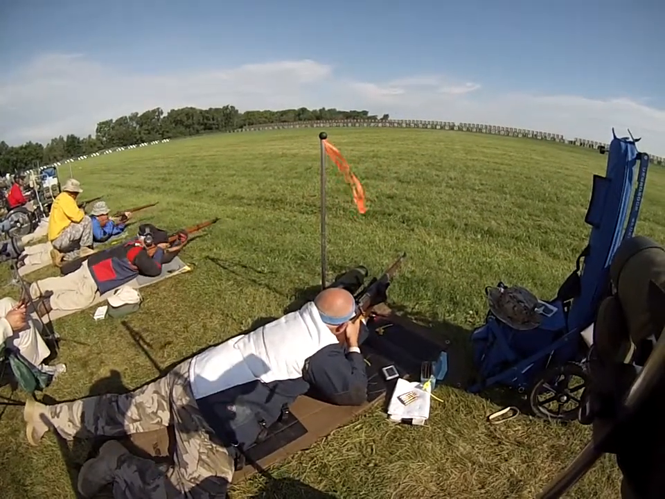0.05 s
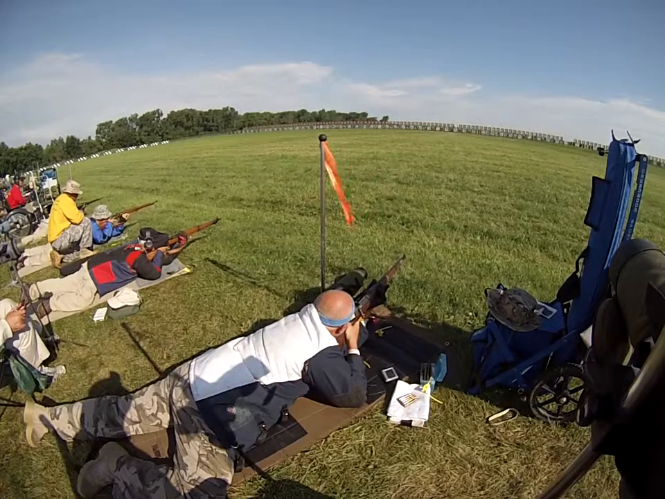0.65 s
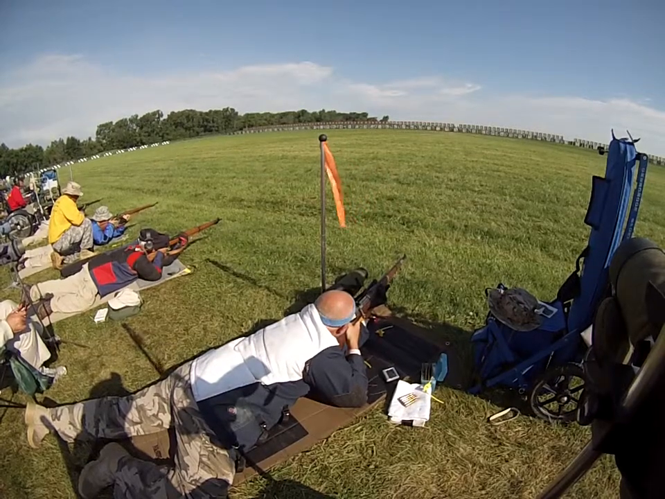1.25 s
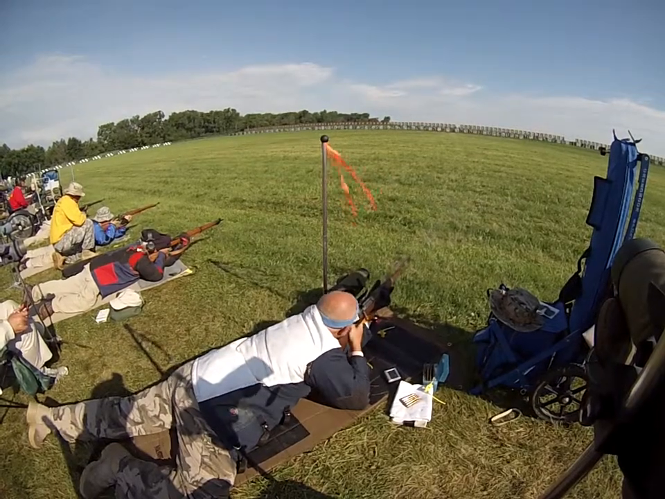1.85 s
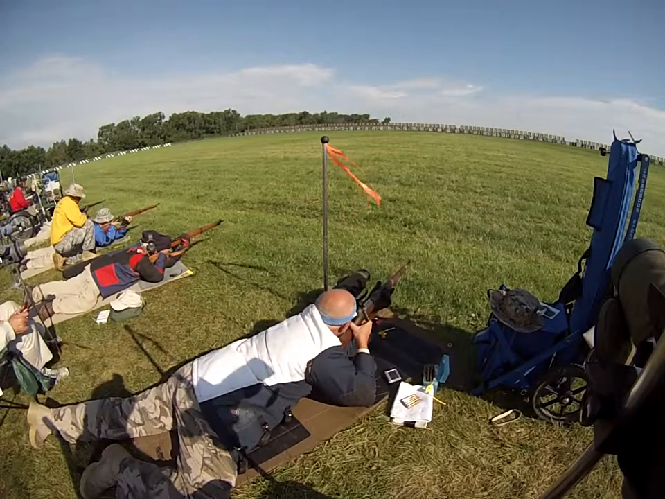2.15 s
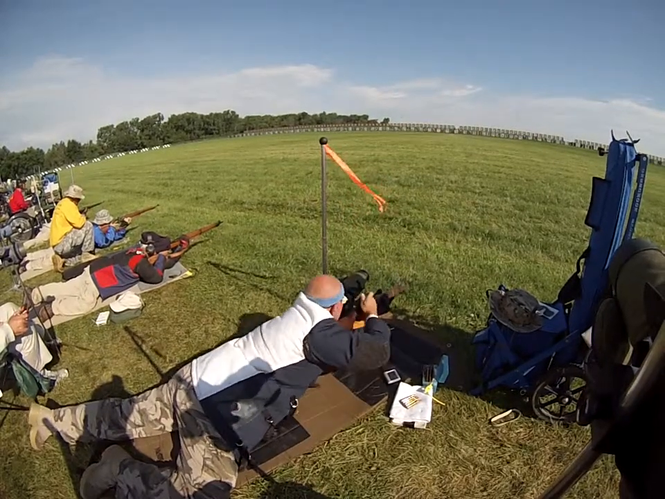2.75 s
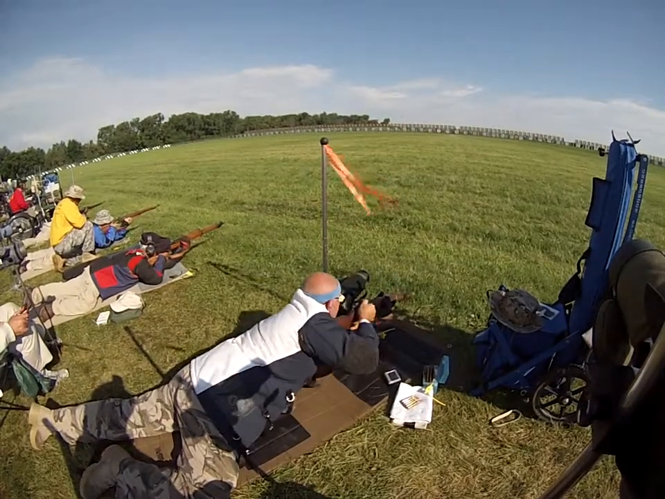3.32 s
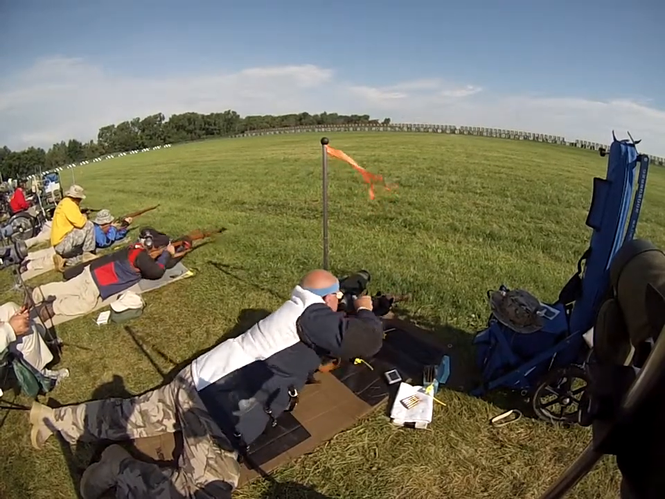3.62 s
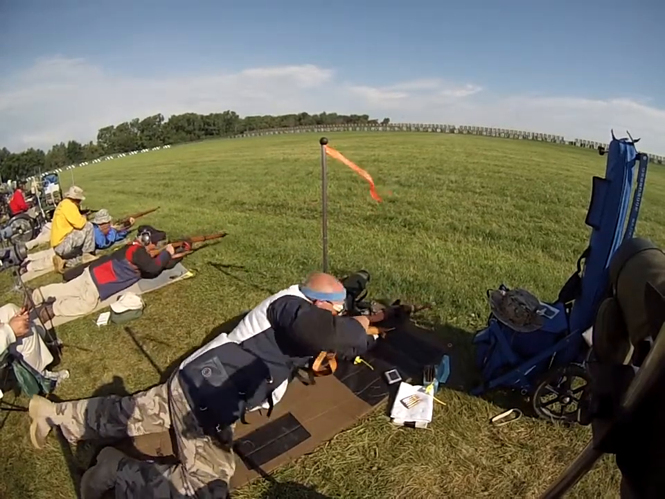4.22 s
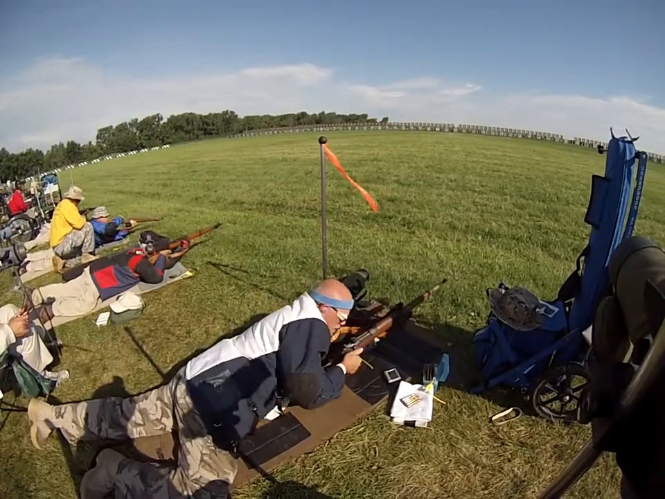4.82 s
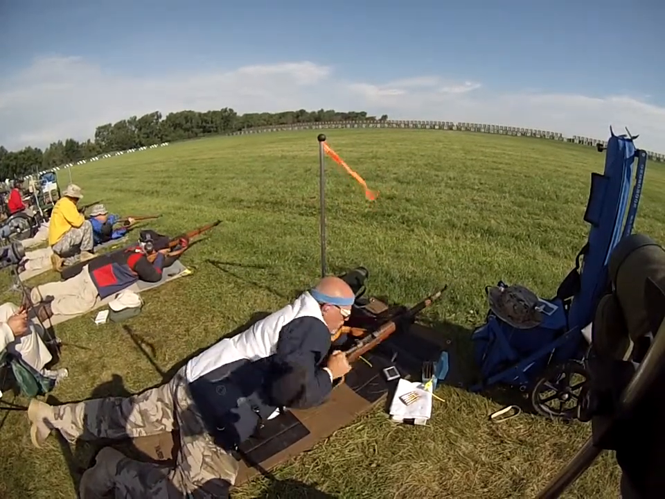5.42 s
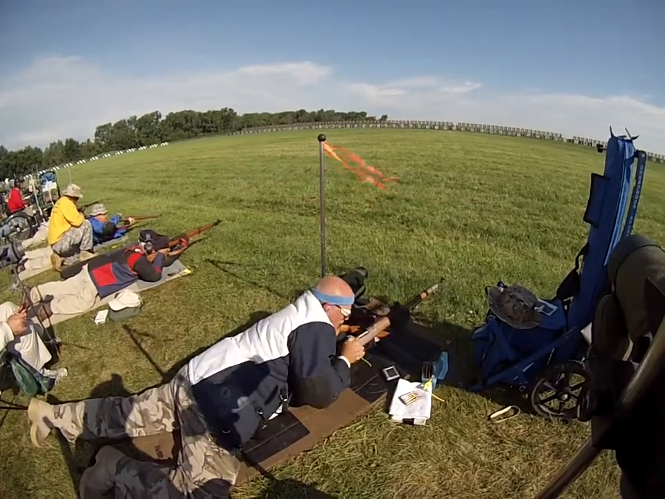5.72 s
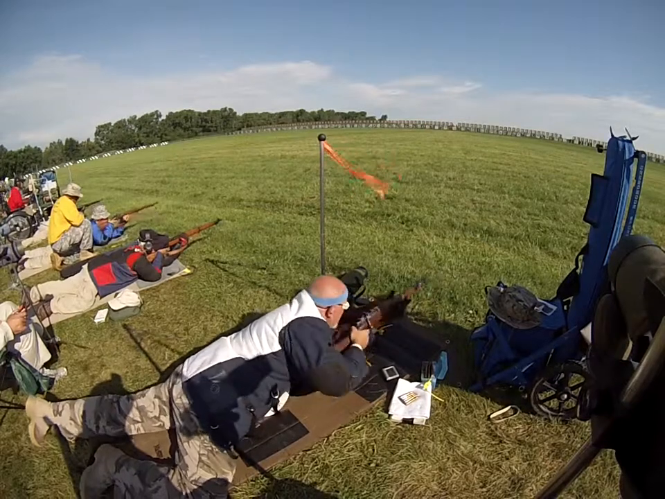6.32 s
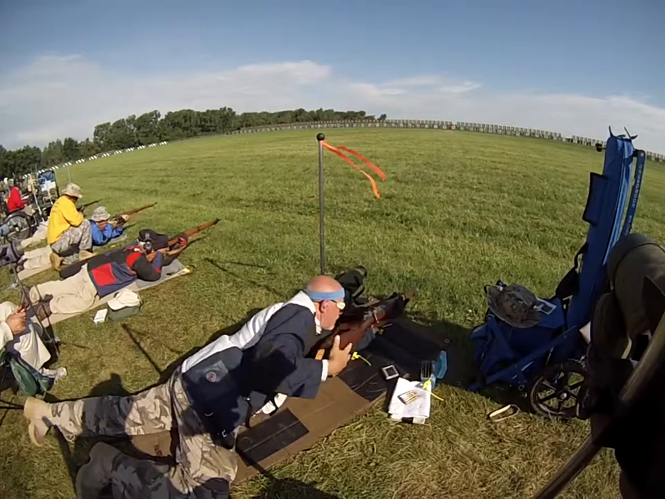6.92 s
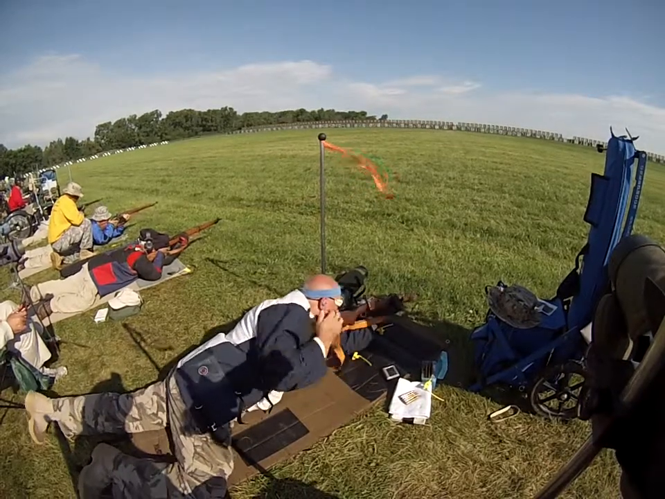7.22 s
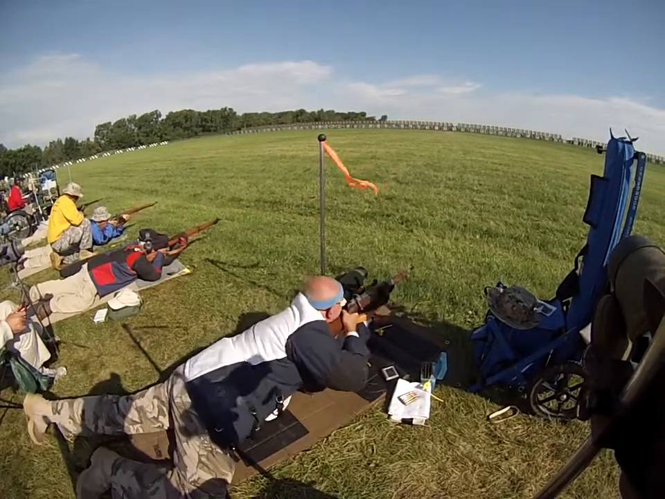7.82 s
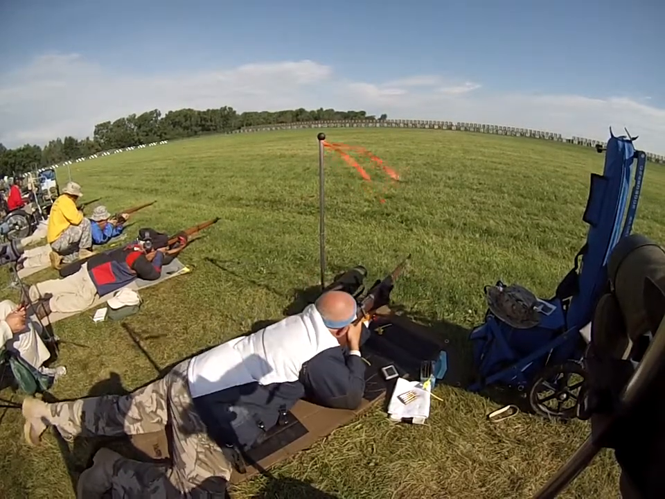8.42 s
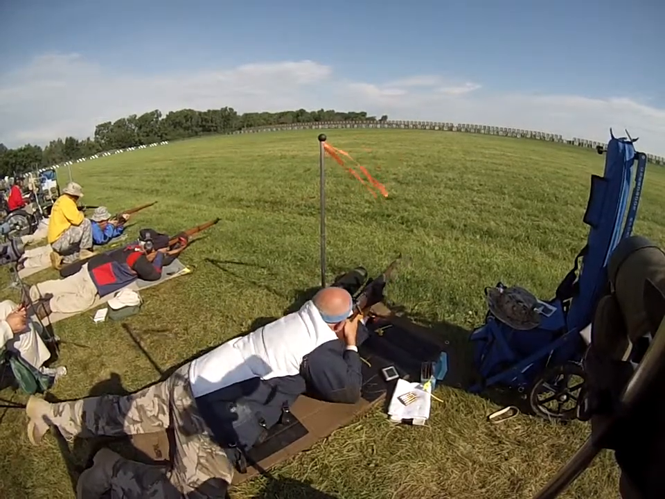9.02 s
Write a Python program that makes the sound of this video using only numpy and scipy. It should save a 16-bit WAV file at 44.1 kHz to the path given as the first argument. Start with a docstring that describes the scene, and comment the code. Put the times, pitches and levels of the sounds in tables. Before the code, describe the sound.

Many rifles fire along an outdoor range, with sharp near cracks, dull distant pops, rolling echo and a bolt being worked.

```python
"""An open grass rifle range in rapid fire, heard from a small cased camera just behind the firing line.
Each muzzle blast is a sharp crack plus a low ground wave; the crack rings the case, and near shots
overload the recorder. The grass sizzles, steel gear rings along and far rifles pop and thud.
Echoes from the tree line merge into a rolling wash, and the nearest shooter works his bolt."""
import sys
import numpy as np
from scipy import signal
from scipy.fft import rfft, irfft, next_fast_len
from scipy.io import wavfile
from scipy.ndimage import minimum_filter1d, map_coordinates

SR = 44100
rng = np.random.default_rng(int(sys.argv[2]) if len(sys.argv) > 2 else 0)


def generate_wav(signal):
    """Clip the signal to [-1, 1] and save it as 16-bit WAV at the path in sys.argv[1]."""
    frames = np.transpose(np.atleast_2d(signal))
    scaled = np.clip(frames, -1, 1) * 32767
    pcm = np.round(scaled).astype(np.int16)
    wavfile.write(sys.argv[1], SR, pcm)


N = 403956

# shots that stand out along the line: t/s, crack gain/dB, boom gain/dB, treble tilt/(dB per octave)
SHOT_CUES = [(0.049, -27.5, -20, 3.5), (0.2031, 11.5, -3.5, -3), (0.312, -13, -33, -5.5),
             (0.3712, -9.5, -16.5, -0.5), (0.4173, -13.5, -21, 3.5), (0.578, -13.5, -26, 2),
             (0.6832, -19, -21.5, -6), (0.7631, 0, -12, -0.5), (0.834, 10, -4.5, -1), (0.9843, -11, -19, 4),
             (1.0086, -11, -26, -4), (1.152, -1.5, -16, 0), (1.2005, -10, -24, -0.5), (1.403, -7, -18, -15),
             (1.4141, -26, -22, 2), (1.5222, -15, -20, -6), (1.584, -14, -27, 0.5),
             (1.6053, -8.5, -18, -0.5), (1.6388, 23, -4, -2), (1.6486, 9.5, -8, 4),
             (1.8369, -10.5, -16.5, -4.5), (1.8891, -9.5, -18.5, 4.5), (1.9458, 10.5, -2, -2.5),
             (1.9543, -10, -30, -4), (2.1449, 10, -7.5, -7.5), (2.242, -11.5, -23.5, 1.5),
             (2.254, -19, -23, -1), (2.4605, -12.5, -28, 0.5), (2.5355, -11.5, -25, 0), (2.578, 16.5, 3, 2),
             (2.7789, -8, -20, 3), (2.8544, -14, -35, 0.5), (2.9616, -13.5, -35, 0), (3.0274, -2.5, -15, 1),
             (3.051, 13, 0.5, 3), (3.1812, 17, 2.5, 4), (3.2705, -12, -26, 2), (3.5141, 10, -4, 1.5),
             (3.6319, 14.5, -2.5, -2.5), (3.706, -12, -36, -3.5), (3.8549, 1.5, -10.5, -5.5),
             (3.8843, -2, -21, -7), (3.891, 4.5, -7, -4), (3.9798, 21, 2.5, -1), (4.0763, -14, -26, 4.5),
             (4.1085, -10.5, -28, 1.5), (4.1706, 5, -8, 0.5), (4.2478, 9, -4.5, -1),
             (4.3052, -1.5, -17, -1.5), (4.3157, -9.5, -24, 3.5), (4.3615, 13, -1, 2.5),
             (4.3937, -10.5, -22, 2.5), (4.4856, -12, -33, 2.5), (4.7756, 8.5, -6, -6.5),
             (5.0116, 11, -3.5, -2), (5.2428, -13.5, -34, -5), (5.2744, -1.5, -16, 2),
             (5.2887, 8.5, -1, 4.5), (5.3871, 17, 1.5, -2.5), (5.7388, -12.5, -29, 1),
             (5.776, -1.5, -14.5, 2), (5.8569, 5.5, -7, -3), (5.8906, -8.5, -20.5, 3.5),
             (6.0318, -19, -22.5, -1.5), (6.0704, -10.5, -22, 2), (6.1788, -10.5, -26, -1.5),
             (6.267, -14, -19.5, -3), (6.4236, -11.5, -28, 2), (6.4596, -9, -15.5, -6.5),
             (6.551, 3.5, -8, -7), (6.7696, -15.5, -30, -1.5), (6.7953, -24.5, -21.5, -4),
             (7.1138, 9.5, -4.5, -1), (7.1565, -11, -30, -1), (7.193, -11.5, -23, 5.5), (7.3, -3, -16, 4.5),
             (7.5879, -9, -31, -4.5), (7.6695, -12, -37, -4), (7.7819, 9.5, -2, -1),
             (7.9243, -9.5, -26, -2), (8.233, -28, -23, -8), (8.3357, -9, -21, 3.5),
             (8.397, -10.5, -25, 0.5), (8.4979, 3, -10.5, -1.5), (8.5283, 24.5, -6, -3),
             (8.5564, 8.5, -8, 1), (8.7405, -13.5, -20.5, -2.5), (8.838, 9, -3.5, 2), (8.9771, -9, -18, 4),
             (9.0599, -11, -26, -2.5)]


def amp(db):
    return 10 ** (np.asarray(db) / 20)


def unit_rms(x):
    return x / np.sqrt(np.mean(x ** 2) + 1e-20)


def unit_peak(response):
    """Scale a response so that its pulse peaks at 1."""
    return response / np.abs(irfft(response)).max()


def resonance(f, hz, width):
    return 1j * f * width / (hz * hz - f * f + 1j * f * width)


def wobble(rate):
    """A smooth random curve, rate knots a second."""
    knots = rng.standard_normal(int(N * rate / SR) + 4)
    return map_coordinates(knots, [np.arange(N) * rate / SR])


def filtered(x, response):
    """Pass x through a complex response of frequency."""
    n = x.shape[-1]
    padded = next_fast_len(n + SR // 10)
    return irfft(rfft(x, padded) * response(np.fft.rfftfreq(padded, 1 / SR)), padded)[..., :n]


def coloured(noise, eq):
    """Shape noise with an EQ curve (f/Hz, level/dB) and bring it to unit RMS."""
    hz, db = np.transpose(eq)
    return unit_rms(filtered(noise, lambda f: amp(np.interp(np.log(f + 1), np.log(hz), db))))


def add(track, start, sound):
    """Mix a sound into the track from start (s) on."""
    part = track[max(round(start * SR), 0):][:len(sound)]
    part += sound[:len(part)]


def muzzle_blasts(shots, size=8192):
    """Crack, turf bounce and boom of each shot, scattered by the mats and gear nearby."""
    out, t, f = np.zeros(N), np.arange(size) / SR, np.fft.rfftfreq(size, 1 / SR)
    front = case_ring(f)
    punch = amp(-3) * unit_peak(resonance(f, hz=540, width=700) / (1 + 1j * f / 2200))
    low_cut = (1j * f / (1j * f + 750)) ** 2  # small objects scatter only short waves
    fade = np.minimum(2 * (1 - t / t[-1]), 1)
    for start, crack_db, boom_db, tilt in shots:
        # the nearer the rifle, the drier its crack and the less of its midrange the turf soaks up
        near = np.clip((crack_db + 3) / 30, 0, 1)
        bounce_ms = 0.541 * np.exp(0.09 * rng.standard_normal())
        bounce = 0.33 * np.exp(-2j * np.pi * f * bounce_ms / 1000)
        brightness = (1 + 1j * f / 2000) ** (tilt / 6)
        early = scatter(t, db=-4 - 5 * near, t60=0.014)
        late = scatter(t, db=-7 - 35 * near, t60=0.15)
        diffuse = low_cut * rfft(early + late)
        crack = amp(crack_db) * (front * brightness * (1 + bounce + diffuse) + np.sqrt(near) * punch)
        push = ground_wave(f, hz=118.5 + 113.5 * near, cut_hz=220 + 300 * near)  # deeper with distance
        boom_tail = rfft(scatter(t, db=-12 - 10 * near, t60=0.25))
        boom = amp(boom_db - 11.1 * near) * push * (1 + boom_tail)
        add(out, start, -irfft(crack + boom) * fade)
    return out


def case_ring(f):
    """The spectrum of a shock front as it sounds inside the camera case."""
    # resonances and notches of the case: f/Hz, width/Hz, gain/dB
    case_bands = [(1190, 520, -5), (1256, 432, 27.5), (1392, 360, 4), (1825, 345, -20), (2450, 350, 7),
                  (2837, 190, -18), (3338, 540, 7), (4904, 206, 14)]
    front = resonance(f, hz=730, width=2450) / (1 + 1j * f / 7000)
    for hz, width, db in case_bands:
        front *= 1 + (amp(db) - 1) * resonance(f, hz, width)
    return unit_peak(front)


def ground_wave(f, hz, cut_hz, low_cut_hz=95):
    """The spectrum of the low push that travels along the turf, rounded off above cut_hz."""
    turf = 1 / (1 - (f / cut_hz) ** 2 + 1.4j * f / cut_hz)
    low_cut = 1j * f / (1j * f + low_cut_hz)
    return unit_peak(resonance(f, hz, width=0.79 * hz) * turf * low_cut)


def scatter(t, db, t60):
    """A fresh diffuse tail whose energy is db relative to the direct pulse."""
    tail = rng.standard_normal(len(t)) * amp(-60 * t / t60) * (1 - np.exp(-t / 0.0012))
    return amp(db) * tail / np.linalg.norm(tail)


def grass_sizzle(send_db=-56, cap_db=9, early_t60=0.069, late_t60=0.51):
    """The grass throws back a short bright sizzle after each cued shot."""
    # colour of the blast scattered by the blades: f/Hz, level/dB
    sizzle_eq = [(400, -21), (1400, -28), (2400, 5), (4800, 17), (7200, 17.5), (8500, 0), (12500, 8.5),
                 (16000, -24)]
    power, t = np.zeros(N), np.arange(SR // 2) / SR
    decay = 4 * amp(-60 * t / early_t60) + amp(-60 * t / late_t60)
    envelope = decay * (1 - np.exp(-t / 0.00022))
    for start, crack_db, *_ in SHOT_CUES:
        add(power, start, (amp(min(crack_db, cap_db) + send_db) * envelope) ** 2)
    blades = rng.standard_normal(N) * amp(1.4 * wobble(500))
    return np.sqrt(power) * coloured(blades, sizzle_eq)


def rolling_booms(send_db=-27, cap_db=-17, rise_s=0.0092, t60=0.51):
    """Each cued shot's ground wave comes back from the field as a short, deep, uneven roll."""
    power, t = np.zeros(N), np.arange(SR) / SR
    envelope = amp(send_db - 60 * t / t60) * (1 - np.exp(-t / rise_s))
    for start, _, boom_db, _ in SHOT_CUES:
        add(power, start, (amp(min(boom_db, cap_db)) * envelope) ** 2)
    lumps = rng.standard_normal(N) * amp(6.1 * wobble(60))
    return np.sqrt(power) * unit_rms(filtered(lumps, lambda f: ground_wave(f, hz=138, cut_hz=200)))


def steel_ring(gain_db=-39, threshold_db=9.5):
    """Near blasts set the metal gear ringing faintly: the harder the blast, the brighter the ring."""
    # modes of steel poles and cart tubes: f/Hz, relative level/dB, t60/s
    steel_modes = [(2019, 0, .7), (3402, -11, 1.0), (4102, -17, .5), (4780, -17, .5), (5879, -19, .6)]
    out, t = np.zeros(N), np.arange(SR) / SR
    hz, mode_db, t60 = np.transpose(steel_modes)
    partials = amp(-60 * t / t60[:, None]) * np.sin(2 * np.pi * hz[:, None] * t)
    for start, crack_db, *_ in SHOT_CUES:
        jitter_db = rng.normal(0, 2.8, len(hz))
        if crack_db > threshold_db:
            bright_db = 0.55 * (crack_db - threshold_db) * np.log2(hz / hz[0])
            add(out, start, amp(gain_db + mode_db + jitter_db + bright_db) @ partials)
    return out


def reloading():
    """The near rifle's bolt scrapes and locks; the ejected brass pings."""
    # strokes of the bolt: t/s, level/dB, rise/s, t60/s
    bolt_strokes = [(3.478, -35, .004, .04), (3.925, -30, .008, 0.064), (3.938, -24, 0.0018, 0.024),
                    (5.612, -42, .003, 0.21), (5.644, -25.5, 0.0031, 0.083), (5.667, -14, 0.0012, 0.032)]
    # spent brass flung from the action: t/s, f/Hz, level/dB, t60/s
    brass_pings = [(3.345, 9700, -66, .3), (3.345, 13900, -68, .2), (5.43, 9950, -58, .45),
                   (5.435, 10070, -58, .3), (5.43, 11000, -59, .2), (5.44, 15100, -62, .25)]
    # colour of the scrape: f/Hz, level/dB
    scrape_eq = [(300, -29), (1100, 1.5), (1900, 6.5), (3000, -1.5), (5000, -3), (8000, -11),
                 (11000, -15.5), (16000, -17)]
    out, t = np.zeros(N), np.arange(SR // 2) / SR
    for start, db, rise, t60 in bolt_strokes:
        scrape = coloured(rng.standard_normal(len(t)), scrape_eq)
        add(out, start, scrape * amp(db - 60 * t / t60) * (1 - np.exp(-t / rise)))
    for start, hz, db, t60 in brass_pings:
        ping = np.sin(2 * np.pi * hz * t)
        add(out, start, ping * amp(db - 60 * t / t60) * (1 - np.exp(-t / 0.0023)))
    return out


def far_rifles(count=70):
    """The far end of the line: dull pops and thuds at random moments, weaker with distance."""
    moment, distance, weight, dullness = rng.uniform(0, 1, (count, 4)).T
    starts = (np.arange(count) + moment) * N / SR / count
    loss_db = 16.5 * np.sqrt(distance)
    crack_db = -7.5 - loss_db - 6 * weight
    boom_db = -17 - loss_db - 7 * (1 - weight)
    return muzzle_blasts(zip(starts, crack_db, boom_db, -4 * dullness), size=4096)


def tree_line_echo(wash_db=-0.5, rumble_db=-9.5):
    """Countless returns from trees and butts merge into a grainy wash over a low rumble."""
    # how loud the rolling echo swells and fades, on wash and rumble together: t/s, level/dB
    echo_level = [(0.0, -39), (0.61, -37.5), (1.84, -40), (1.99, -41), (2.4, -40), (2.83, -44),
                  (3.14, -37.5), (3.47, -40.5), (4.26, -35.5), (4.8, -41.5), (5.49, -37), (7.09, -44),
                  (7.78, -40), (8.04, -38.5), (8.83, -37), (9.16, -39.5)]
    # colour of the wash: f/Hz, level/dB
    wash_eq = [(150, -77), (450, -20), (1020, -13), (1300, -3.5), (1500, 2), (1700, -10.5), (1880, -14),
               (2120, -7), (2400, -8), (2900, -16), (3350, -13.5), (4300, -27), (4850, -22), (8000, -42.5),
               (16000, -97)]
    # colour of the rumble: f/Hz, level/dB
    rumble_eq = [(12, -26), (28, 0.5), (55, 9.5), (110, 3.5), (180, -3.5), (280, -18.5), (700, -44)]
    level = amp(np.interp(np.arange(N) / SR, *np.transpose(echo_level)))
    wash = coloured(rng.standard_normal(N) * amp(1.15 * wobble(350) + 2.36 * wobble(45)), wash_eq)
    rumble = coloured(rng.standard_normal(N) * amp(0.9 * wobble(25)), rumble_eq)
    return level * (amp(wash_db) * wash + amp(rumble_db) * rumble)


def overload_duck(x, allowed_share=0.16, db_per_share=80, hold_s=0.14, glide_s=0.0038):
    """The recorder's gain ducks for a moment when too much of the last 20 ms was overloaded."""
    window, hold = SR // 50, int(hold_s * SR)
    hot_share = signal.lfilter(np.ones(window) / window, 1, np.abs(x) > 0.6)
    duck_db = -db_per_share * np.maximum(hot_share - allowed_share, 0)
    held_db = minimum_filter1d(duck_db, hold, origin=(hold - 1) // 2)
    step = 1 / (glide_s * SR)
    return x * amp(signal.lfilter([step], [1, step - 1], held_db))


def scene():
    """The firing line, its echoes and the small sounds near the camera over steady air hiss, in mono."""
    hiss = amp(-73) * rng.standard_normal(N)
    firing_line = muzzle_blasts(SHOT_CUES) + grass_sizzle() + steel_ring() + far_rifles()
    return (firing_line + rolling_booms() + tree_line_echo() + reloading() + hiss)[None]


def record(dry):
    """Near blasts overload the recorder; clipping and treble roll-off run twice to limit the peaks."""
    hardness, rolloff_hz, top_hz = 14, 12300, 15600
    x = overload_duck(dry)
    for ceiling in (1, 0.98):  # the second clip tames the filter's overshoot
        x = x / (1 + np.abs(x / ceiling) ** hardness) ** (1 / hardness)
        x = filtered(x, lambda f: 1 / np.sqrt((1 + (f / rolloff_hz) ** 8) * (1 + (f / top_hz) ** 100)))
    return x


dry = scene()
out = record(dry)
generate_wav(out)
```